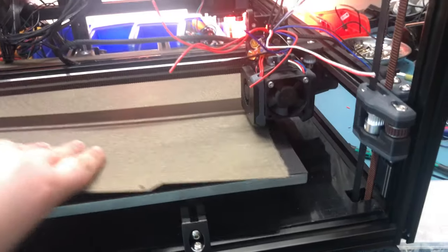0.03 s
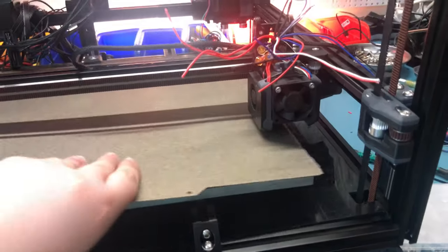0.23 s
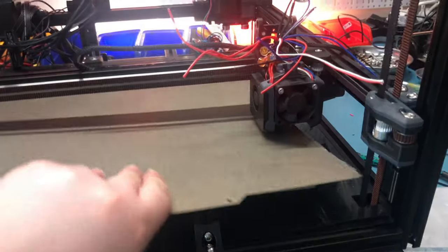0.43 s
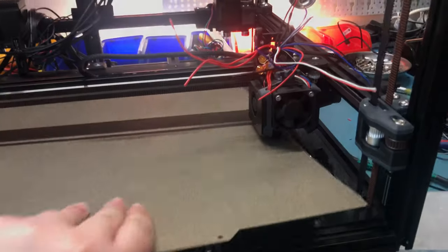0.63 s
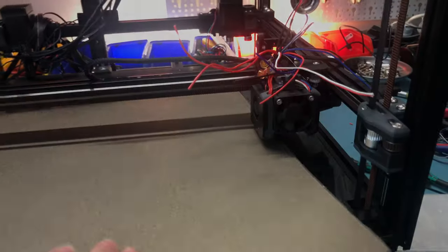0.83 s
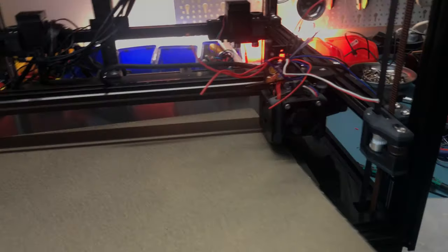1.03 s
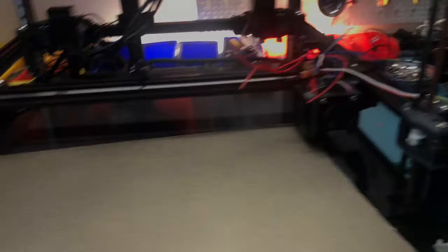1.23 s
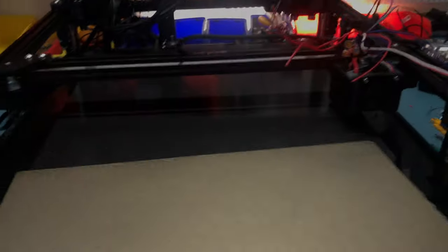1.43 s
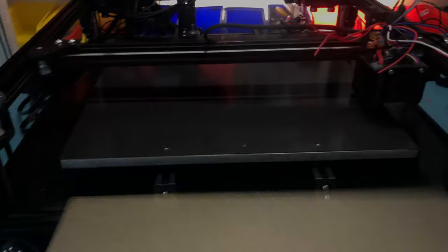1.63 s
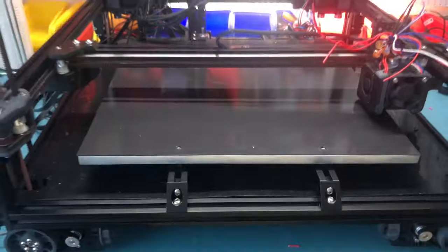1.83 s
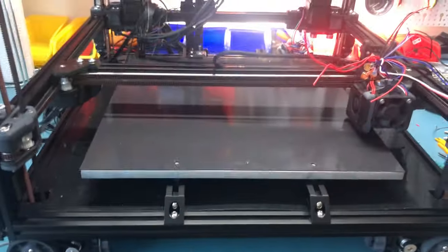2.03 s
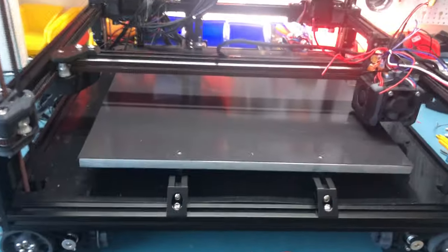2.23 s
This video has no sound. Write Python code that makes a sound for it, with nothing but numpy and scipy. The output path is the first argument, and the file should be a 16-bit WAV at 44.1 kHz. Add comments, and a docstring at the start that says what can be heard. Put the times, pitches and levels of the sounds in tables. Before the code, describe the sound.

Flexible steel sheet sliding in short hissing strokes, lightly ticking and chirping, then snapping free with one sharp hollow pop, a brief rattle and dull wobbles fading into soft brushing; near, mono, indoor workshop.

```python
"""A thin spring-steel sheet is dragged in jerks off a flat bed: its grain hisses as shaped, gritty noise.
Friction and taps ring the sheet's modes; catches chirp roughly, and a thin squeak sinks as it slows.
As it comes free it buckles with a rising pop, made of a gliding tone, and its edge clatters in noise bursts.
It then wobbles dully in the hand amid soft brushing; a low rumble and a quiet room lie beneath."""
import sys
import numpy as np
from scipy import signal
from scipy.fft import rfft, irfft
from scipy.io import wavfile
from scipy.ndimage import uniform_filter1d

SR = 44100
rng = np.random.default_rng(int(sys.argv[2]) if len(sys.argv) > 2 else 0)


def dump_mix(stems):
    """Bounce the given channels to the path in sys.argv[1] as a 16-bit WAV at rate SR."""
    frames = np.atleast_2d(stems).T  # one column per channel
    limited = np.clip(frames, -1, 1)  # hard clip at full scale
    pcm = np.round(limited * 32767).astype(np.int16)
    wavfile.write(sys.argv[1], SR, pcm)


def convert_level_to_amplitude(level_db):
    """Map a level in decibels to its linear amplitude factor."""
    exponent = np.asarray(level_db, float) / 20
    return 10 ** exponent


N = 101297
T = np.arange(N) / SR  # time in seconds


def unit(x):
    """Scale to rms 1."""
    return x / np.sqrt(np.mean(x ** 2))


def curve(rows, axis=1):
    """Join one column of a table by straight lines over time."""
    table = np.array(rows)
    return np.interp(T, table[:, 0], table[:, axis])


def colour(x, points):
    """Shape the spectrum of x by (Hz, dB) points, then scale to rms 1."""
    hz, db = np.array(points).T
    bins_hz = np.arange(N // 2 + 1) * SR / N
    gain_db = np.interp(np.log(bins_hz + 1), np.log(hz), db)
    return unit(irfft(rfft(x) * convert_level_to_amplitude(gain_db), N))


def walk(rate):
    """Wandering curve of rms 1: random levels held for 1 / rate seconds, then smoothed twice."""
    hold = max(int(SR / rate), 1)
    steps = np.repeat(rng.standard_normal(N), hold)[:N]
    return unit(uniform_filter1d(uniform_filter1d(steps, hold), hold))


def grit(spread_db):
    """Noise of dense contacts of uneven size, rms 1."""
    contacts = rng.standard_normal(N)
    size_db = spread_db * rng.exponential(size=N)
    return unit(contacts * convert_level_to_amplitude(size_db))


def ring(x, hz, t60):
    """One mode driven by x, fading 60 dB in t60 seconds; an impulse of 1 rings with a peak of about 1."""
    r = np.exp(-np.log(1000) / (t60 * SR))
    w = 2 * np.pi * hz / SR
    return signal.lfilter([0, np.sin(w)], [1, -2 * r * np.cos(w), r * r], x)


def patchy(x):
    """Every third of an octave swells and fades on its own, as the contact wanders."""
    bands_hz = 900 * 2 ** np.arange(0, 4.3, 1 / 3)
    return unit(sum(ring(x, hz, 9 / hz) * convert_level_to_amplitude(3.5 * walk(25)) for hz in bands_hz))


def glides(rows):
    """Each row is a short tone whose pitch slides evenly from start to end."""
    out = np.zeros(N)
    for start, db, start_hz, end_hz, length in rows:
        u = np.arange(int(length * SR)) / (length * SR)  # 0 to 1 along the glide
        phase = 2 * np.pi * length * (start_hz * u + (end_hz - start_hz) * u ** 2 / 2)
        swell = np.sin(np.pi * u) ** 0.3
        first = int(start * SR)
        out[first:first + len(u)] += convert_level_to_amplitude(db) * swell * np.sin(phase)
    return out


# Jerks of the slide. Each row: centre in seconds, level in dB,
# seconds from the centre to where the swell has shrunk to 1/e.
JERKS = [(0.0, -37, 0.011), (0.248, -56.5, 0.12), (0.415, -45.5, 0.047), (0.554, -43, 0.07),
         (0.741, -43.5, 0.087), (0.966, -41, 0.084), (1.186, -38, 0.06), (1.409, -41.5, 0.1)]
# Colour of the grain's hiss. Each row: frequency in Hz, relative strength in dB per Hz.
HISS_COLOUR = [(530, -47), (1200, -17.5), (1790, -10), (2330, -7), (5280, 1), (13200, -10.5), (16000, -5.5)]


def sliding():
    """The textured face rubs over the bed: gritty hiss that swells with each jerk."""
    swell = sum(convert_level_to_amplitude(db) * np.exp(-((T - centre) / half) ** 2) for centre, db, half in JERKS)
    return colour(patchy(grit(2.2)), HISS_COLOUR) * swell * convert_level_to_amplitude(walk(62.43))


# Friction and flexing that shake the sheet. Each row: time in seconds,
# level in dB of the deep modes, of the low modes, and of the high modes.
SHAKE_LEVELS = [(0, -46, -38.5, -45), (.075, -44, -59, -71), (.12, -64, -66, -68), (.28, -66, -55, -59),
                (.33, -53.5, -60, -59), (.56, -42.5, -48, -51.5), (.7, -51, -43, -50), (.79, -61, -59, -60),
                (1.38, -66.5, -53.5, -55), (1.45, -59, -44.5, -52), (1.52, -68, -48.5, -48),
                (1.585, -72, -52.5, -53.5), (1.6, -73, -45.5, -37.5), (1.655, -54, -32, -34.5),
                (1.685, -40, -19.5, -27), (1.72, -57, -30.5, -31), (1.76, -35, -32, -50),
                (1.83, -46, -28, -43.5), (1.91, -33.5, -32, -48), (2.0, -57, -38, -83),
                (2.15, -61.5, -57.5, -63)]
# The two frequencies in Hz that part the deep, low and high modes.
GROUP_SPLITS_HZ = (200, 740)
# The sheet's modes. Each row: frequency in Hz before any bending,
# strength in dB relative to the other modes of its group when shaken.
MODES = [(105, 2), (150, 2), (200.5, 2), (253, 0), (300, -6), (343, 7.5), (410, 0), (475, 2), (545, 0.5),
         (635, 0), (710, -0.5), (818, 2), (900, 1), (955, 6), (1085, 9.5), (1230, 4.5), (1440, -2),
         (2340, -24)]
# The modes sink as the lifted sheet relaxes. Each row: time in seconds, share of the pitch.
PITCH_SAG = [(1.8, 1.0), (2.1, .8)]


def shaking():
    """Stick-slip friction drives the sheet's modes, whose pitches wander as it bends."""
    groups = np.zeros((3, N))
    for hz, db in MODES:
        rub = grit(1.5) * convert_level_to_amplitude(1.5 * walk(30))
        steady = ring(rub, hz, t60=.065)
        # reading the ringing faster or slower moves its pitch
        bend = np.cumsum(curve(PITCH_SAG) * (1 + .04 * walk(35)))
        mode = np.interp(bend, np.arange(N), steady) * convert_level_to_amplitude(2.5 * walk(40))
        groups[np.searchsorted(GROUP_SPLITS_HZ, hz)] += convert_level_to_amplitude(db) * unit(mode)
    return sum(unit(g) * convert_level_to_amplitude(curve(SHAKE_LEVELS, axis=k + 1)) for k, g in enumerate(groups))


# Low rumble through the table. Each row: time in seconds, level in dB.
RUMBLE_LEVELS = [(0, -45), (.17, -50.5), (.75, -53), (.85, -58.5), (1.5, -57.5), (1.64, -53), (1.68, -26.5),
                 (1.76, -52), (1.88, -39), (2.0, -62.5), (2.3, -63)]


def rumbling():
    """Noise through one narrow resonance gives a low rumble that throbs."""
    rumble_hz, width_hz = 71.8, 7.5
    low = unit(ring(rng.standard_normal(N), rumble_hz, 2.2 / width_hz))
    return low * convert_level_to_amplitude(curve(RUMBLE_LEVELS))


# Colour of the still room. Each row: frequency in Hz, relative strength in dB per Hz.
ROOM_COLOUR = [(24, -10), (354, -10.5), (715, -8), (1520, -2.5), (2150, -5.5), (3740, -14.5), (16000, -26)]


def room():
    """Quiet, steady noise of the still room."""
    return colour(rng.standard_normal(N), ROOM_COLOUR) * convert_level_to_amplitude(-57.5)


# Ticks and clatter of the edge. Each row: start in seconds, level in dB before the extra treble,
# extra treble in dB, seconds to fade by 60 dB.
EDGE_CLICKS = [(0.1534, -38, 12, 0.005), (.99, -36, -15, 0.11), (1.598, -44.5, -8, 0.6),
               (1.639, -32, -14, 0.07), (1.6565, -25, -1, .07), (1.68, -33, -5, .15), (1.705, -35, 8, 0.15),
               (1.743, -47, 8, 0.081), (1.770, -34, -9, 0.05), (1.799, -39, -14, .03),
               (1.816, -41, -12, 0.03), (1.877, -62.5, 16, 0.58)]
# Colour of the edge's noise. Each row: frequency in Hz, relative strength in dB per Hz.
EDGE_COLOUR = [(880, -37), (1500, 2), (3250, -3.5), (4120, 3), (5070, -2.5), (10800, -12.5), (13000, -12),
               (16000, -11.5)]


def edge():
    """Rough bursts of noise that start fast and die away, some brighter than others."""
    treble_hz, rise_share = 6500, .02  # the rise is a share of the fade time
    noise = colour(grit(1.5), EDGE_COLOUR) * convert_level_to_amplitude(1.5 * walk(600))
    treble = signal.sosfiltfilt(signal.butter(2, treble_hz, "high", fs=SR, output="sos"), noise)
    out = np.zeros(N)
    for start, db, treble_db, t60 in EDGE_CLICKS:
        after = np.maximum(T - start, 0)
        rise = np.minimum(after / (rise_share * t60), 1)
        burst = noise + (convert_level_to_amplitude(treble_db) - 1) * treble
        out += burst * convert_level_to_amplitude(db - 60 * after / t60) * rise
    return out


# Taps that ring the sheet. Each row: start in seconds, strength in dB,
# frequency in Hz near which the modes answer, contact time in milliseconds.
SHEET_TAPS = [(.203, -46, 590, 7.3), (.215, -36.5, 1476, 3.2), (.218, -43.5, 950, 1.67),
              (.368, -33, 1500, 2.4), (0.386, -36, 1080, 7), (1.057, -37.5, 256, 8.5),
              (1.085, -41, 278, 5.7), (1.101, -33.5, 214, 6.9), (1.415, -38.5, 350, 14),
              (1.467, -29.5, 1213, 13.4), (1.596, -28, 454, 9.2), (1.680, -10, 770, 2.15),
              (1.687, -21, 740, 3.9), (1.703, -15, 734, 4.6)]


def tapping():
    """Each tap is a short push that rings the sheet's modes, favouring those near its own frequency."""
    blows = np.zeros((len(SHEET_TAPS), N))
    for row, (start, db, near_hz, ms) in zip(blows, SHEET_TAPS):
        u = np.arange(int(ms * SR / 1000) + 2)
        push = np.sin(np.pi * u / len(u)) * np.sin(2 * np.pi * near_hz * u / SR)
        first = int(start * SR)
        row[first:first + len(u)] = convert_level_to_amplitude(db) * push / np.abs(push).sum()
    near = np.array(SHEET_TAPS)[:, 2]
    out = np.zeros(N)
    for hz, _ in MODES:
        share = np.exp(-(np.log(hz / near) / .5) ** 2)  # how much of each tap this mode takes
        out += ring(share @ blows, hz, t60=.055)
    return out


# Catches of the grain. Each row: start in seconds, level in dB before roughening,
# first pitch in Hz, last pitch in Hz, length in seconds.
GRAIN_CATCHES = [(.398, -44, 2320, 2580, 0.017), (.551, -40.5, 2200, 2920, 0.056),
                 (.649, -39, 3120, 2770, 0.008), (1.662, -33, 2950, 2730, 0.014)]


def catching():
    """The grain snags and chirps: short glides made rough by fast random changes of level."""
    return glides(GRAIN_CATCHES) * walk(1000)


# A thin squeak that sinks as the sheet slows. Each row: time in seconds, pitch in Hz, level in dB.
SQUEAK_PATH = [(1.39, 5250, -56), (1.42, 5420, -43), (1.475, 4650, -45), (1.495, 4150, -48),
               (1.51, 3900, -65)]


def squeaking():
    """A single tone with a slightly shaky pitch and level."""
    pitch_hz = curve(SQUEAK_PATH) * (1 + .006 * walk(200))
    phase = 2 * np.pi * np.cumsum(pitch_hz) / SR
    inside = (T > SQUEAK_PATH[0][0]) & (T < SQUEAK_PATH[-1][0])
    return np.sin(phase) * convert_level_to_amplitude(curve(SQUEAK_PATH, axis=2) + 2 * walk(120)) * inside


# Buckles of the sheet. Each row: start in seconds, peak in dB,
# first pitch in Hz, last pitch in Hz, length in seconds.
SHEET_BUCKLES = [(1.6655, -5.5, 340, 645, 0.014), (1.650, -22, 375, 325, 0.0096),
                 (1.770, -22, 370, 378, 0.015), (1.806, -28, 408, 358, 0.01),
                 (1.828, -21.5, 137, 151, 0.016), (1.838, -26.5, 408, 533, 0.029),
                 (1.854, -19, 263, 256, 0.023), (1.903, -22.5, 200, 157, 0.0059),
                 (1.957, -26, 272, 340, 0.013)]


def buckling():
    """A bending wave glides cleanly in pitch as the curve of the sheet snaps over."""
    return glides(SHEET_BUCKLES)


# Soft brushing after the lift. Each row: time in seconds, level in dB.
BRUSH_LEVELS = [(1.8, -63), (1.95, -51.5), (2.1, -50.5), (2.3, -57)]
# Colour of the brushing. Each row: frequency in Hz, relative strength in dB per Hz.
BRUSH_COLOUR = [(530, -31), (900, -4), (1170, -9.5), (1460, 0.5), (2300, -19), (2700, -13), (3590, -8),
                (4920, -16), (5960, -20), (7060, -23.5), (16000, -39)]


def brushing():
    """A soft rub: gritty noise with broad resonances."""
    rub = colour(grit(0.53), BRUSH_COLOUR)
    level_db = curve(BRUSH_LEVELS) + walk(29.77)
    return rub * convert_level_to_amplitude(level_db) * (T > BRUSH_LEVELS[0][0])


def echo(near):
    """Frame and walls answer with a short tail of fading noise."""
    t = T[:SR // 2]
    fade = convert_level_to_amplitude(-60 * t / 0.38)  # 60 dB in 0.38 s
    tail = rng.standard_normal(len(t)) * fade * (t > .003)
    tail = tail / np.sqrt(np.sum(tail ** 2))
    return convert_level_to_amplitude(-8.5) * signal.fftconvolve(near, tail)[:N]


def scene():
    """The near sounds and their echo, over the rumble and the room."""
    near = sliding() + squeaking() + shaking() + tapping() + buckling() + catching() + edge() + brushing()
    return (near + echo(near) + rumbling() + room())[None]


def low_pass(x):
    """Removes everything above the highest recorded frequency."""
    return signal.sosfilt(signal.butter(12, 16970, fs=SR, output="sos"), x)


def record(dry):
    """The microphone drops the deepest bass and the top."""
    bass_hz, top_hz = 45, 15800
    mix = signal.sosfilt(signal.butter(2, bass_hz, "high", fs=SR, output="sos"), dry)
    mix = signal.sosfilt(signal.ellip(10, .3, 70, top_hz, fs=SR, output="sos"), mix)
    return low_pass(mix)


dry = scene()
out = record(dry)
dump_mix(out)
```